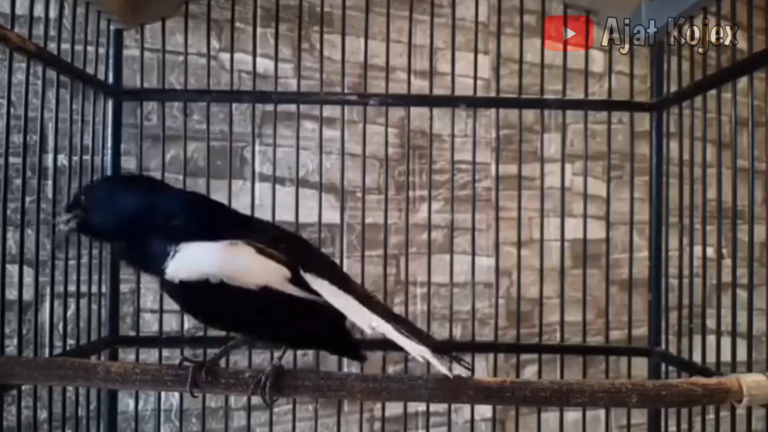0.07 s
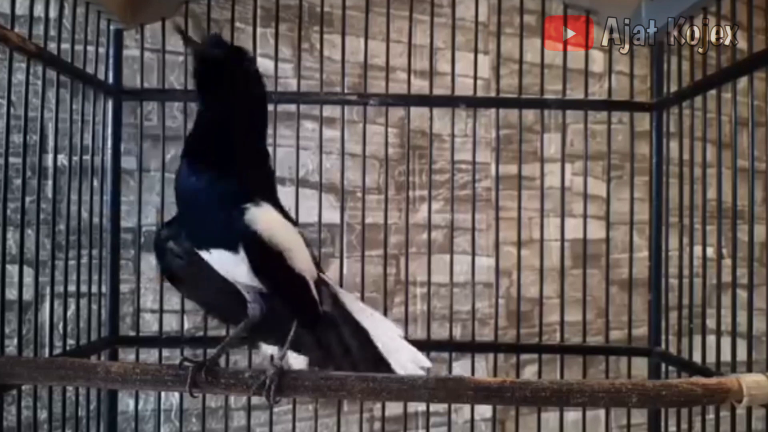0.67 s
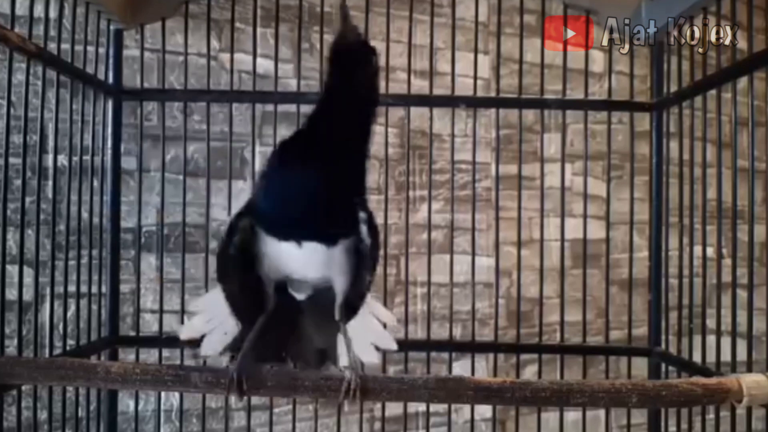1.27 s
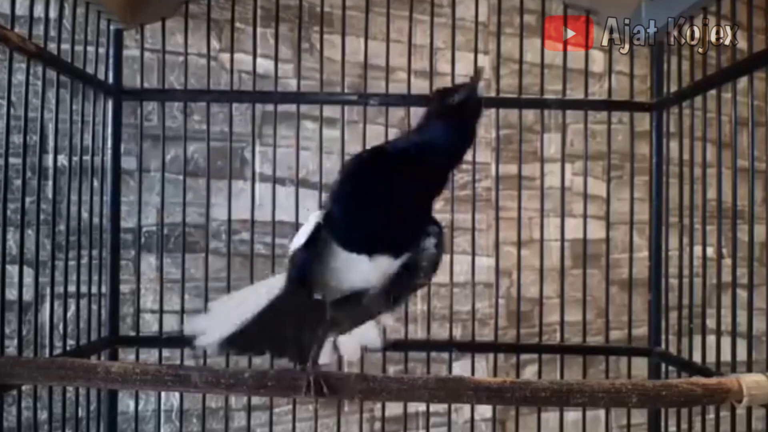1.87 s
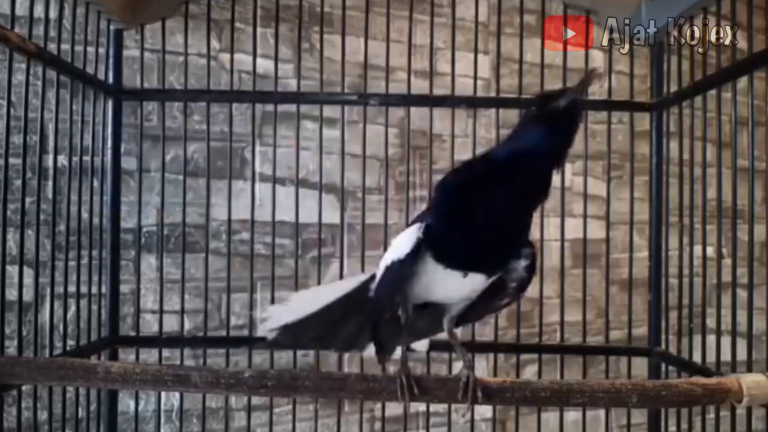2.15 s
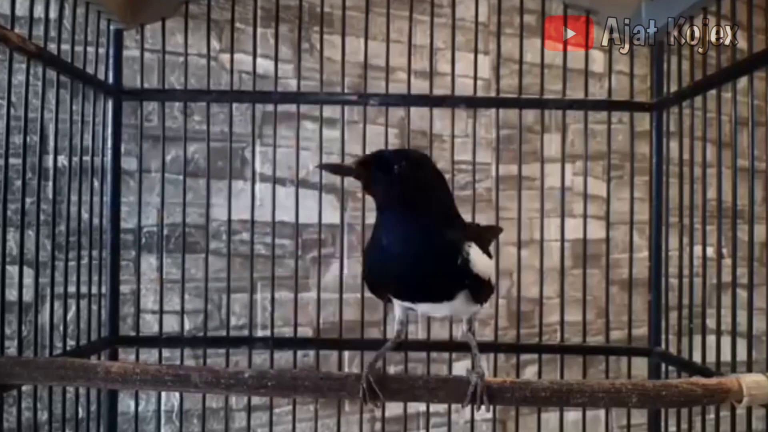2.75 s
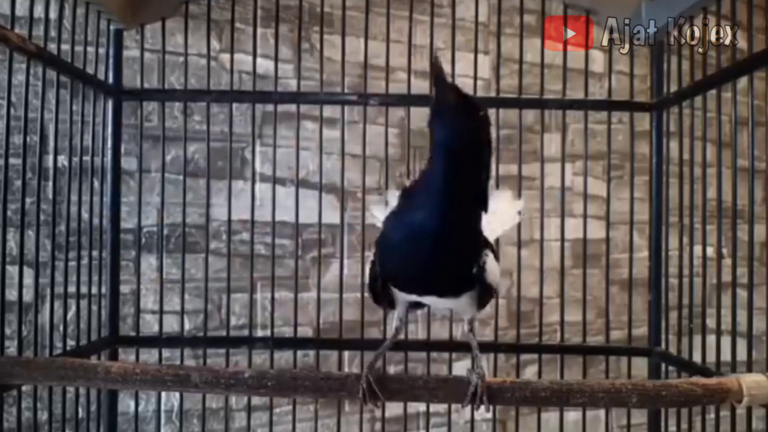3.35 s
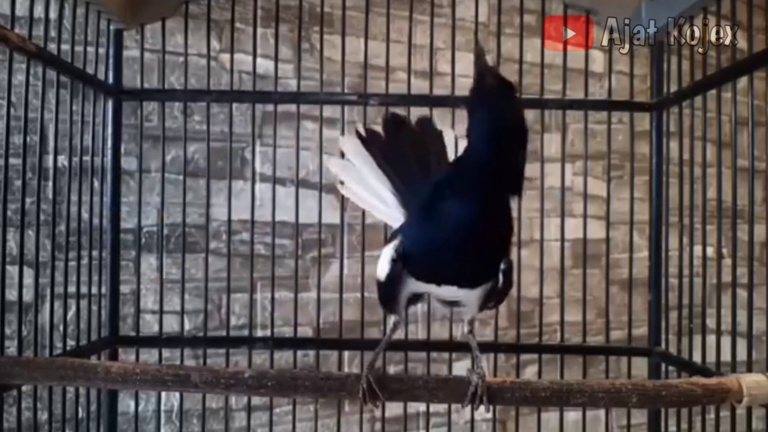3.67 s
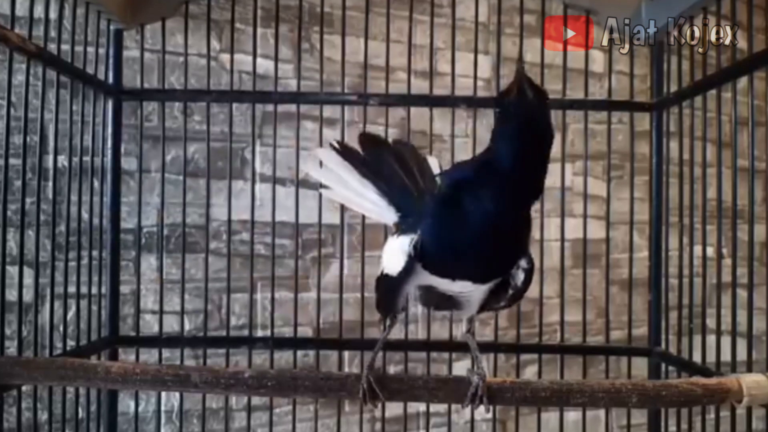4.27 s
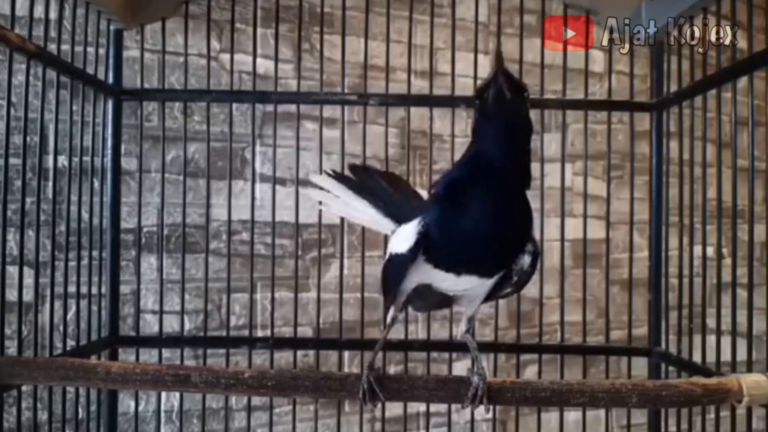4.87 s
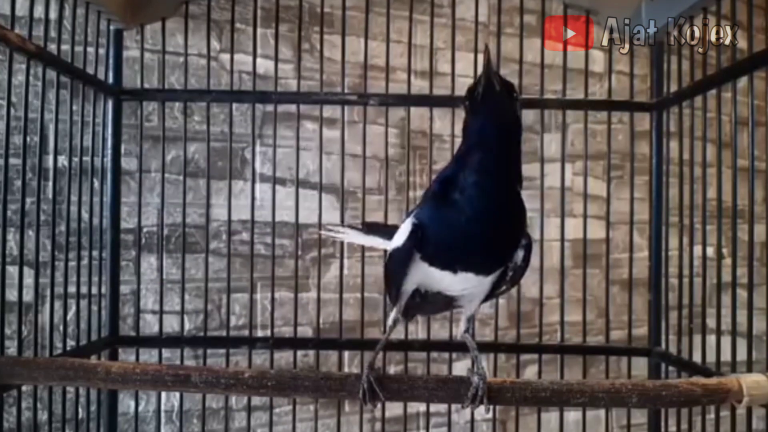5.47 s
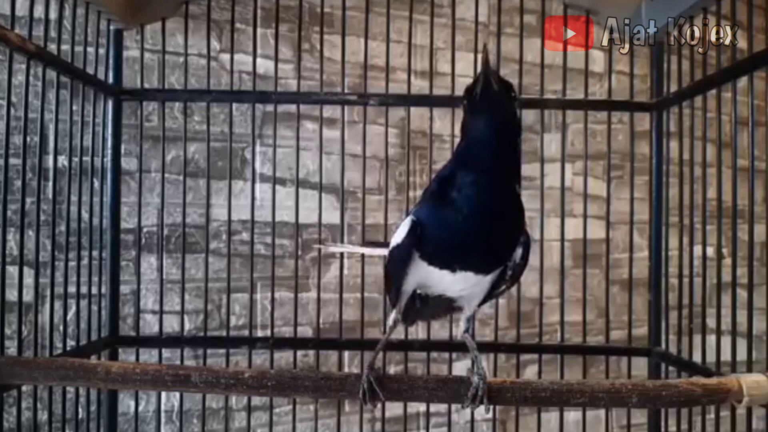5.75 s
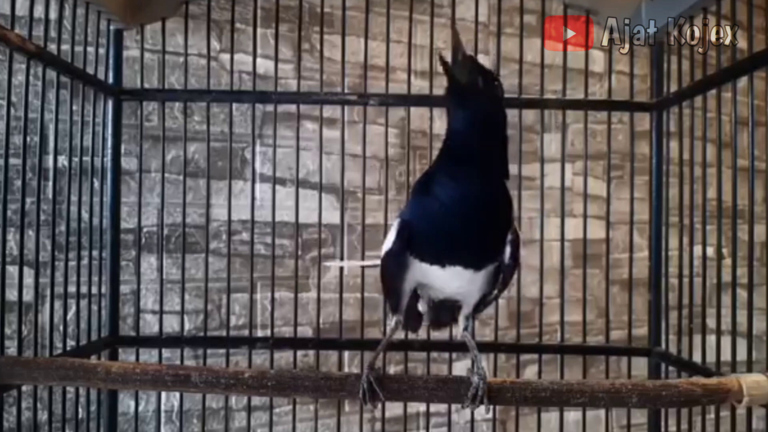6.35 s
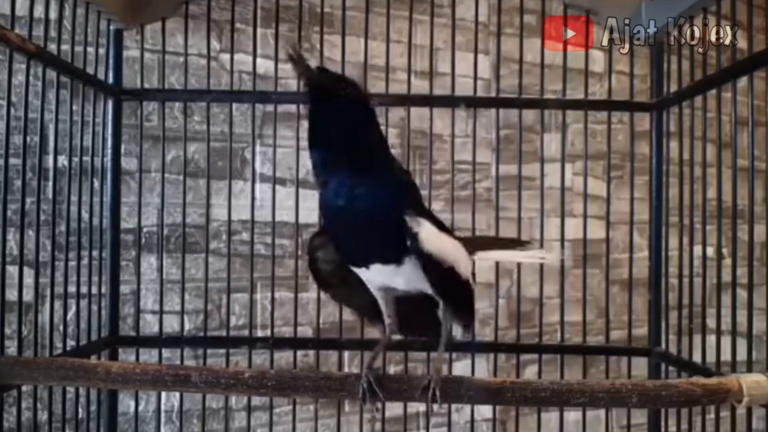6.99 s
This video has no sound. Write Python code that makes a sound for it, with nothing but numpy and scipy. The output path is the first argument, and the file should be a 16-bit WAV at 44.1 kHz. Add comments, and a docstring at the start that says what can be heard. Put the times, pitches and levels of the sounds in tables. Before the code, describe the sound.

Loud, rapid birdsong comes from a single caged bird right by the microphone. Clear whistles and darting glides tumble together with hoarse, reedy notes, then trills and brief buzzing rasps mix in. Near the end the feathers give a very soft puff before a closing warble. The small room adds a short echo and a faint low rumble, and the peaks overload a little.

```python
"""A caged magpie-robin close to the microphone, a stone wall behind it, in a small room with a faint rumble.
It opens with loud whistles, quick glides and reedy notes, overlapping from the two sides of its syrinx.
Trills join after a second, rasps after three; at 5.5 s one note keeps breaking to the octave below.
Near 6.6 s the bird shifts on its perch, then ends on a warble and a hook. All along, the room answers
briefly and the loudest notes overload the recorder."""
import sys
import numpy as np
from scipy import signal
from scipy.fft import rfft, irfft
from scipy.io import wavfile
from scipy.ndimage import uniform_filter1d

SR = 44100
rng = np.random.default_rng(int(sys.argv[2]) if len(sys.argv) > 2 else 0)


def digitize_waveform(pressure):
    """Quantize a signal to 16-bit integers and store it at the path in sys.argv[1].

    Rows of a 2-D input are taken as channels; values are limited to [-1, 1].
    """
    field = np.atleast_2d(pressure).T
    bounded = np.clip(field, -1, 1)
    quanta = np.round(bounded * 32767).astype(np.int16)
    wavfile.write(sys.argv[1], SR, quanta)


N = 313992


def gain_of(db):
    """Decibels to a factor."""
    return 10 ** (np.asarray(db) / 20)


def unit_rms(x):
    """Scales to rms 1."""
    return x / np.sqrt(np.mean(x ** 2) + 1e-20)


def value_at(points, hz):
    """Reads (f/Hz, value) points on a log-frequency axis."""
    f, value = np.transpose(points)
    return np.interp(np.log(hz + 1), np.log(f + 1), value)


def shaped_noise(spectrum):
    """Scene-long noise coloured by (f/Hz, level/dB) points."""
    gains = gain_of(value_at(spectrum, np.fft.rfftfreq(N, 1 / SR)))
    return irfft(rfft(rng.standard_normal(N)) * gains, N)


def wander(t, hz):
    """Smooth random motion of rms 1, as long as t, rolling off around hz."""
    f = np.fft.rfftfreq(len(t), 1 / SR)
    return unit_rms(irfft(rfft(rng.standard_normal(len(t))) * np.exp(-(f / hz) ** 2 / 2), len(t)))


def phase_of(hz):
    """Running phase of a pitch curve."""
    return 2 * np.pi * np.cumsum(hz) / SR


def add(mix, start, sound):
    """Mixes a sound in at start seconds."""
    part = mix[max(round(start * SR), 0):][:len(sound)]
    part += sound[:len(part)]


def span(start, end, edge_s=.0035):
    """Times and soft-edged gate of one note."""
    t = np.arange(start - edge_s / 2, end + edge_s, 1 / SR)
    ramp = np.clip(np.minimum(t - t[0], (t[-1] - t) / 2) / edge_s, 0, 1)
    return t, np.sin(np.pi / 2 * ramp) ** 2


def either_side(t, start, length, share):
    """How far a note is before and after the moment at a share of its length, each 0-1."""
    share = np.clip(share, .02, .98)
    progress = np.clip((t - start) / length, 0, 1)
    return np.maximum(1 - progress / share, 0), np.maximum((progress - share) / (1 - share), 0)


def effort(t, start, length, loudest, onset_db=-5, swell_db=-15, fade_db=-9.5):
    """Level in dB: a note swells to its loudest moment and fades; a long one starts more gently."""
    before, after = either_side(t, start, length, loudest)
    onset = np.exp(-np.maximum(t - start, 0) / (.13 * length))
    return onset_db * onset + swell_db * before ** 2.16 + fade_db * after ** 1.29


def bend(start, length, first_hz, turn_hz, last_hz, turn, db, loudest, hoarse):
    """A note (times, gate, pitch, level, hoarseness) that slows into one turn and speeds away."""
    t, gate = span(start, start + length)
    before, after = either_side(t, start, length, turn)
    hz = turn_hz + (first_hz - turn_hz) * before ** 2.1 + (last_hz - turn_hz) * after ** 1.5
    return t, gate, hz, db + effort(t, start, length, loudest), hoarse


def sweep(start, length, first_hz, last_hz, db, loudest, hoarse):
    """A note that glides one way, slowing a little; a falling one dies away as it drops."""
    t, gate = span(start, start + length)
    hz = first_hz + (last_hz - first_hz) * np.clip((t - start) / length, 0, 1) ** .85
    octaves_fallen = np.maximum(np.log2(first_hz / hz), 0)
    return t, gate, hz, db - 3.5 * octaves_fallen ** 2 + effort(t, start, length, loudest), hoarse


def gesture(rows):
    """A note drawn through timed points: times, gate and a smoothed curve for each further column."""
    times, *columns = np.transpose(rows)
    times = np.sort(times)
    t, gate = span(times[0], times[-1])
    curves = [uniform_filter1d(np.interp(t, times, c), size=180, mode="nearest") for c in columns]
    return t, gate, *curves


def background():
    """A faint, distant rumble that swells and sinks behind the bird."""
    # spectrum of the rumble: f/Hz, level/dB
    spectrum = [(20, -17.5), (50, -3.5), (110, 1.5), (190, -6), (320, -9.5), (600, -20), (1200, -24),
                (2500, -28.5), (5000, -34), (10000, -44), (16000, -38)]
    # its slow rise and fall: t/s, level/dB
    levels = [(0, -51), (.8, -48), (1.6, -50.5), (2.2, -46), (2.6, -46), (3.2, -47), (3.8, -49),
              (4.6, -49.5), (5.5, -54), (6.2, -56.5), (6.65, -51), (7.1, -62.5)]
    t = np.arange(N) / SR
    rumble = unit_rms(shaped_noise(spectrum))
    return gain_of(np.interp(t, *np.transpose(levels)) + 1.8 * wander(t, 6)) * rumble


def tone(phase, overtones_db=0, sheen_db=0, sheen_hz=13800, sheen_width_hz=2200):
    """A near sine: the throat holds overtones back, the open beak favours those in the top octave."""
    hz = np.gradient(phase) * SR / (2 * np.pi)
    overtones = 0
    for k, db in (2, -33), (3, -46), (4, -50):
        sheen = np.exp(-((k * hz - sheen_hz) / sheen_width_hz) ** 2)
        overtones += gain_of(db + (13 + sheen_db) * sheen) * np.sin(k * phase)
    return np.sqrt(2) * (np.sin(phase) + gain_of(overtones_db) * overtones)


def whistle(note, sheen_db=0, rattle_hz=125, weak_below_hz=2110, weak_db_per_octave=-11.5):
    """A pure note as (start, sound, hoarseness); when hoarse, the membrane flutters and rattles."""
    t, gate, hz, db, hoarse = note
    rough = np.clip(hoarse, 0, 1.2) ** 3
    rattle = np.sin(phase_of(rattle_hz * (1 + .25 * wander(t, 42))))
    unsteady = rough * np.interp(db, [-18, -3], [1.5, .8])  # a weakly blown membrane is less steady
    flutter = .06 * wander(t, 550) + .04 * rattle
    throb = 1 + .4 * unsteady * rattle + .2 * unsteady * wander(t, 900)
    throat_db = weak_db_per_octave * np.maximum(np.log2(weak_below_hz / hz), 0)
    hz = hz * (1 + .0029 * wander(t, 100) + unsteady * flutter)
    voice = tone(phase_of(hz), overtones_db=10 * rough, sheen_db=sheen_db)
    return t[0], gate * gain_of(db + throat_db) * throb * voice, hoarse


def whistles():
    """The whistled part of the song: the syrinx arches, glides and winds in pitch."""
    # arches and scoops: t/s, length/s, first f/Hz, turn f/Hz, last f/Hz, turn at/share, level/dB,
    # loudest at/share, hoarseness, extra sheen/dB
    arches = [ (0.04, 0.06, 3040, 3580, 3393, 0.24, -5, 0.48, 0.29, 0),
              (0.535, 0.036, 3410, 3190, 3294, 0.52, -6, 1, 0.4, 13),
              (0.788, 0.032, 3116, 3530, 3534, 0.35, -0.5, .6, 0.61, 14.5),
              (1.174, .061, 1600, 3600, 1390, 0.51, -14.5, 0.82, 0.78, -9),
              (1.835, .037, 2520, 2360, 1350, 0.45, -19.5, .45, 0.46, 5),
              (1.986, 0.06, 1336, 3557, 1664, 0.54, -13.5, 0.73, 0.82, 11),
              (2.18, 0.0863, 4134, 4145, 4306, 0.33, -2.5, 0.86, 0.26, 5),
              (2.559, 0.076, 3334, 3824, 3550, 0.54, -6, 0.56, 0.38, 24.5),
              (2.712, 0.17, 3546, 4153, 3690, 0.37, -10.5, 0.44, 0.35, 10.5),
              (2.927, 0.029, 6540, 5510, 6030, 0.41, -26.5, .45, 0.26, 6.5),
              (2.98, 0.022, 6300, 5210, 5600, 0.32, -23.5, 0.4, 0.42, 20),
              (3.021, 0.034, 6230, 4890, 5600, 0.38, -17, 0.54, 0.44, 8),
              (3.054, 0.035, 5170, 3950, 4710, 0.32, -20.5, 1, 0.62, 2),
              (3.08, 0.033, 4610, 3720, 4170, 0.48, -18, 0.19, 0.56, 4),
              (4.104, 0.026, 2467, 3050, 3010, 0.5, -3, 0.84, 0.71, 17),
              (4.128, 0.048, 5340, 3310, 4520, 0.8, -0.5, .45, 0.91, -5),
              (4.279, 0.04, 4580, 4187, 4580, 0.64, -2, .5, 0.63, -9),
              (4.28, 0.06, 2478, 2283, 3766, 0.22, -5, 0.96, 0.79, 0),
              (4.99, .042, 4587, 1933, 2960, 0.86, -5, 0.17, 0.83, 2),
              (5.032, 0.0188, 2810, 2225, 3210, 0.38, -4.5, 1, 0.77, -1),
              (5.332, .11, 2450, 2808, 2636, 0.48, -8.5, 0.22, 0.68, 4),
              (5.752, 0.03, 2906, 2978, 2650, 0.28, -1, 0.35, 0.56, 0),
              (5.854, 0.034, 2915, 2946, 2534, 0.13, -2.5, 0.32, 0.61, 7),
              (6.043, .125, 3860, 4270, 4170, 0.79, 0.5, 0.21, 0.44, -12),
              (6.238, 0.11, 3965, 4083, 3930, 0.62, 5.5, 0.62, 0.2, -4.5),
              (6.343, 0.057, 3235, 3240, 3540, 0.42, -1, 0.68, 0.54, 9),
              (6.489, 0.047, 1763, 3240, 3475, 0.56, -3.5, 0.51, 0.66, -8),
              (6.763, 0.049, 2143, 4414, 4450, 0.58, -7.5, 0.67, 0.49, 4.5),
              (6.802, 0.075, 3270, 3242, 4277, .16, -5, 0.47, 0.51, 5)]
    # quick glides: t/s, length/s, first f/Hz, last f/Hz, level/dB, loudest at/share, hoarseness
    glides = [ (0.178, 0.019, 5020, 2700, -5, 0.16, 1.04), (0.304, 0.023, 3360, 6000, -9, 0.45, 1.15),
              (0.324, 0.069, 4410, 2210, -3.5, 0.12, 0.88), (0.77, 0.024, 4500, 2006, -8, 0.52, 1),
              (0.778, 0.024, 5590, 3328, -8, 0.66, 0.99), (1.011, 0.044, 3480, 1900, -27.5, 0.057, 0.99),
              (1.144, 0.023, 3300, 1330, -20, 0.07, 1), (1.268, 0.015, 4730, 3500, -6.5, 0.62, 1.13),
              (1.285, 0.036, 3483, 1112, -2.5, 0.067, 0.85), (1.382, 0.032, 3160, 1440, -23, 0.073, 0.77),
              (1.631, 0.015, 5290, 4400, -22.5, 0.66, .9), (1.645, 0.05, 4830, 1500, -17.5, 0.28, 0.98),
              (1.725, 0.01, 4360, 2920, -13, 0.84, 1.11), (1.737, 0.041, 4040, 1077, -1.5, 0.23, 0.81),
              (1.778, 0.067, 2714, 3595, -12.5, 0.28, .7), (1.81, 0.018, 5080, 3390, -11, 0.77, 0.7),
              (1.94, 0.038, 5740, 1656, -17, .6, 0.86), (3.36, 0.066, 3450, 3240, -8, 0.16, 0.42),
              (3.47, 0.022, 3740, 2663, -0.5, 0.76, 0.89), (3.845, 0.015, 5620, 3095, 4, 0.24, 0.92),
              (3.848, 0.026, 7040, 6470, -6, 0.48, 0.77), (4.451, 0.045, 4480, 3156, 0.5, 0.16, 0.9),
              (4.625, 0.006, 5300, 4050, -18.5, 0.39, 0.86), (5.313, 0.028, 3175, 2313, -17.5, .2, 0.67),
              (6.005, .042, 3600, 3910, -14, 0.47, 0.7)]
    # winding whistles, one curve each: t/s, f/Hz, level/dB, hoarseness
    climb = [(.523, 4196, -28.5, .48), (.538, 3970, -5, 0.5), (.552, 4010, -23, 0.5), (.568, 4477, 0, 0.4),
             (.655, 4884, 2, 0.6), (.668, 4140, -5.5, 0.66), (.698, 4020, -3.5, .55),
             (.716, 3748, -4, 0.62), (.728, 3810, -19, 0.77)]
    dip_and_hold = [(.892, 4210, -26, 0.3), (.904, 2997, -4, 0.32), (.917, 3720, -6, 0.78),
                    (0.928, 3583, 3, 0.47), (.955, 3706, -7, .45), (0.969, 3635, -3.5, 0.81)]
    hold_and_flick = [(3.969, 2410, -37.5, .3), (3.983, 3210, -12, 0.74), (4.003, 3450, -2.5, 0.49),
                      (4.039, 3515, 6, 0.32), (4.065, 3687, -2, 0.5), (4.078, 4750, -21, 1)]
    lead_in = [(4.978, 3033, -15.5, 0.53), (4.992, 3310, -4.5, 0.64), (5.004, 2986, -3, 0.84),
               (5.031, 3000, -5.5, 0.94), (5.066, 2980, 2, 0.38), (5.08, 3278, -1, 0.75),
               (5.099, 3230, -6.5, 0.47), (5.113, 3670, 3, .4)]
    descent = [(6.401, 4520, -16, 0.58), (6.415, 4115, 2, 0.51), (6.44, 4050, -1.5, 0.55),
               (6.458, 3634, -0.5, 0.4), (6.473, 3106, -1.5, 0.37), (6.489, 2960, -6, .6)]
    warble = [(6.935, 2544, -22, 0.64), (6.948, 2870, -11.5, 0.34), (6.965, 2995, -8, 0.27),
              (6.978, 2730, -2, 0.43), (6.991, 3125, -2.5, 0.68), (7.003, 2394, -4.5, 0.69)]
    hook = [(7.042, 3240, -16, 0.91), (7.052, 1896, -11, 0.29), (7.061, 2685, -6, 0.52),
            (7.082, 2980, -18, 0.91)]
    for row in glides:
        yield whistle(sweep(*row))
    for *shape, sheen_db in arches:
        yield whistle(bend(*shape), sheen_db)
    for curve in climb, dip_and_hold, hold_and_flick, lead_in, descent, warble, hook:
        yield whistle(gesture(curve))


def air(leaking, level_db=-18, grain_db=3):
    """Air forced through the syrinx: a gritty hiss that follows the strength of the leak."""
    # spectrum of the hiss: f/Hz, level/dB
    spectrum = [(100, -16), (1000, -8), (2500, -1), (4500, 1.5), (6500, 1), (8500, -9.5), (11000, -7),
                (14000, -2), (16000, -8)]
    strength = np.sqrt(abs(uniform_filter1d(leaking ** 2, size=90)))
    hiss = unit_rms(shaped_noise(spectrum) * gain_of(grain_db * wander(leaking, 320)))
    return strength * hiss * gain_of(level_db)


def room(x, tail_db=-14, onset_s=.0017):
    """The microphone hears the bird directly, then a few near reflections and a short diffuse tail."""
    # early reflections: delay/s, gain
    echoes = [(.0021, 0.2), (.0047, 0.012), (.0079, 0.13), (.0113, 0.082), (.0165, -0.31), (.0228, 0.14)]
    # decay of the room: f/Hz, time to fall by 60 dB/s
    decay = [(300, 0.19), (1500, 0.11), (3500, 0.14), (6000, .14), (14000, 0.16)]
    hz, t, noise = signal.stft(rng.standard_normal(SR // 2), SR, nperseg=256)
    tail = signal.istft(noise * gain_of(-60 * t / value_at(decay, hz)[:, None]), SR, nperseg=256)[1]
    tail *= 1 - np.exp(-(np.arange(len(tail)) / SR / onset_s) ** 2)
    response = gain_of(tail_db) * tail / np.linalg.norm(tail)
    response[0] += 1
    for delay, gain in echoes:
        response[round(abs(delay) * SR)] += gain
    return signal.fftconvolve(x, response)[:N]


def throat(hz, throat_hz, width_octaves, skirt_db):
    """Ten harmonics of a buzzing syrinx through one throat resonance."""
    k = np.arange(1, 11)[:, None]
    detuning = np.log2(k * hz / throat_hz) / width_octaves
    gains = gain_of(-skirt_db * np.log10(1 + detuning ** 4)) * (k * hz < SR / 2)
    return np.sqrt(2) * (gains * np.sin(k * phase_of(hz))).sum(0) / np.linalg.norm(gains, axis=0)


def reeds(jitter=.024, doubling=.051):
    """Nasal notes; alternate cycles differ a little, which adds faint tones between the harmonics."""
    # reedy notes: t/s, length/s, first f/Hz, turn f/Hz, last f/Hz, turn at/share, level/dB,
    # loudest at/share, hoarseness, throat f/Hz
    notes = [ (0.302, 0.036, 1868, 2972, 2070, 0.43, -7.5, 1, 1.23, 4020),
             (0.335, 0.073, 2042, 1731, 1453, .5, -11, 0.44, 0.96, 3120),
             (0.962, 0.048, 1757, 1798, 1710, 0.45, -22, 0.92, 0.77, 3700),
             (1.322, 0.053, 1700, 1758, 1930, 0.4, -11.5, 0.59, 0.63, 3400),
             (1.407, 0.057, 2104, 2076, 2340, 0.52, -14.5, 0.88, 0.82, 3380),
             (1.463, 0.072, 1930, 1791, 1338, 0.11, -20, 0.17, 0.9, 2820),
             (2.484, 0.051, 1930, 2638, 2500, 0.78, -19.5, 0.37, 0.68, 3180),
             (3.807, 0.02, 1640, 1400, 1447, .5, -8, 0.8, 0.83, 3950),
             (4.437, .057, 998, 1829, 1154, 0.54, -6.5, 0.75, 0.75, 2960),
             (5.328, 0.023, 828, 869, 866, 0.42, -6, 1, 0.54, 2160),
             (5.726, .029, 3560, 1560, 2520, 0.79, -11.5, 0.34, 0.5, 2150),
             (5.83, 0.031, 3347, 1617, 2100, 0.92, -6.5, 0.32, 0.68, 2150),
             (5.947, 0.13, 1900, 2171, 2733, .45, -11, 0.45, 0.42, 2870)]
    for *shape, throat_hz in notes:
        t, gate, hz, db, hoarse = bend(*shape)
        hz = hz * (1 + jitter * hoarse ** 2 * wander(t, 510))
        alternation = 1 + doubling * np.cos(phase_of(hz) / 2)
        buzz = throat(hz, throat_hz, width_octaves=.69, skirt_db=26.5)
        yield t[0], gate * gain_of(db) * alternation * buzz, hoarse


def trills(jitter=.2, hurry_dip_db=23, rough_dip_db=16):
    """Pitch swings about a gliding centre; the voice thins on the way up when hurried or rough."""
    # trilled notes: t/s, length/s, first f/Hz, last f/Hz, level/dB, loudest at/share, hoarseness,
    # first rate/Hz, last rate/Hz, swing/Hz, falling part of a swing/share, roughness
    notes = [ (1.047, 0.098, 4222, 4557, 2.5, 0.1, 0.73, 44, 54, 441, 0.52, 0.11),
             (2.274, 0.1, 4727, 4697, -10.5, 0.32, 0.8, 99, 53, 640, .5, 0.22),
             (2.264, 0.13, 4000, 4245, -11.5, .2, 1.06, 117, 100, 190, 0.6, 0),
             (2.268, 0.12, 2990, 2446, -24, .45, 1, 86, 53, 270, 0.64, 0.4),
             (2.715, 0.095, 3938, 4142, -8.5, 0.53, 0.71, 102, 112, 370, 0.34, 0.01),
             (3.426, 0.057, 3760, 3760, -4, 0.87, 1.1, 61, 50, 523, 0.483, 0.66),
             (3.617, .057, 3555, 4322, -2.5, 0.57, 0.59, 58, 68, 393, .45, .05),
             (4.634, 0.12, 4597, 4750, -1, 0.18, 0.86, 87, 113, 618, 0.75, 0.08),
             (4.816, .097, 5097, 4810, 2, 0.16, .9, 110, 78, 657, 0.71, 0.05),
             (5.111, 0.15, 3386, 3424, 1, 0.11, 0.3, 27.5, 31, 149.2, 0.74, 0)]
    for *shape, first_rate, last_rate, swing_hz, fall, rough in notes:
        t, gate, hz, db, hoarse = sweep(*shape)
        rate = np.linspace(first_rate, last_rate, len(t)) * (1 + .065 * wander(t, 140))
        cycle = np.cumsum(rate) / SR % 1
        angle = np.pi * np.where(cycle < fall, cycle / fall, 1 + (cycle - fall) / (1 - fall))
        hz = (hz + swing_hz * np.cos(angle)) * (1 + jitter * rough * wander(t, 900))
        dip_db = hurry_dip_db * max(2 * fall - 1, 0) + rough_dip_db * rough
        rising = np.maximum(-np.sin(angle), 0)
        yield t[0], gate * gain_of(db - dip_db * rising) * tone(phase_of(hz)), hoarse


def rasps(flutter_hz=135, unevenness=.88, shimmer=7.9):
    """Low buzzes shaken in pitch and strength by a fast, uneven flutter."""
    # harsh notes: t/s, length/s, first f/Hz, last f/Hz, level/dB, loudest at/share, hoarseness,
    # throat f/Hz, flutter/share of pitch
    notes = [ (3.183, 0.023, 2010, 1643, -14, 0.64, 0.46, 2570, 0.067),
             (3.21, 0.0417, 870, 753, -11, 0.28, 0.51, 1806, 0.056),
             (5.391, 0.013, 1009, 779, -9, 0.48, 0.4, 1960, 0.078),
             (5.419, 0.0132, 916, 722, -11, 0.39, 0.6, 1980, 0.071),
             (6.627, .048, 1019, 825, -14.5, 0.64, 0.6, 1900, 0.036)]
    for *shape, throat_hz, flutter in notes:
        t, gate, hz, db, hoarse = sweep(*shape)
        shake = np.sin(2 * np.pi * flutter_hz * (t - t[0])) + unevenness * wander(t, 690)
        strength = gate * gain_of(db) * (1 + shimmer * flutter * wander(t, 510))
        buzz = throat(hz * (1 + flutter * shake), throat_hz, width_octaves=.72, skirt_db=31)
        yield t[0], strength * buzz, hoarse


def stutter(breaks_per_s=36, lift=.025, hoarse=.6):
    """The membrane flips in and out of period doubling, breaking to the octave below."""
    # course of the breaking note: t/s, f/Hz, level/dB, depth of the break/0-1
    curve = [(5.514, 2790, -40, 0.43), (5.53, 2464, -14, 0.07), (5.548, 2438, -10, 0.7),
             (5.6, 2503, -4.5, 0.25), (5.632, 2348, -6.5, 0.69), (5.652, 2270, -20, 0.1)]
    t, gate, hz, db, depth = gesture(curve)
    flip = -np.sin(2 * np.pi * breaks_per_s * (t - curve[0][0]))
    broken = .5 + .5 * np.tanh(8 * (flip - .15))
    phase = phase_of(hz * (1 + lift * (2 * broken - 1) + .007 * wander(t, 500)))
    octave_below = np.sin(phase / 2) + gain_of(-15) * np.sin(1.5 * phase)
    voice = tone(phase, overtones_db=6) * (1 - depth * broken) + depth * broken * octave_below
    return t[0], gate * gain_of(db) * voice, hoarse


def feather_puff(start_s=6.58, length_s=.16, centre_hz=299, width_hz=130, level_db=-41.5):
    """A soft swell of low noise from the feathers as the bird shifts on its perch."""
    t = np.arange(N) / SR
    swell = np.sin(np.pi * np.clip((t - start_s) / length_s, 0, 1))
    noise = unit_rms(wander(t, width_hz) * np.sin(2 * np.pi * centre_hz * t))
    return gain_of(level_db) * swell * noise


def scene(clear_leak=.006):
    """The song at one close microphone, in the room; hoarse notes leak far more air than clear ones."""
    song, leaking = np.zeros((2, N))
    for start, sound, hoarse in *whistles(), *reeds(), *trills(), *rasps(), stutter():
        leak = clear_leak + np.clip(hoarse, 0, 1) ** 2.4
        add(song, start, sound)
        add(leaking, start, sound * leak)
    return (room(song + air(leaking)) + feather_puff() + background())[None]


def record(dry, ceiling=.88, bias=.037, low_cut_hz=25, high_cut_hz=16250):
    """Soft, slightly lopsided overload adds overtones, the highest folding back; then the band limits."""
    driven = ceiling * (np.tanh(dry / ceiling + bias) - np.tanh(bias))
    driven = signal.sosfilt(signal.butter(1, low_cut_hz, "high", fs=SR, output="sos"), driven)
    low_pass = signal.firwin(255, high_cut_hz, window=("kaiser", 8), fs=SR)
    return signal.oaconvolve(driven, low_pass[None], "same")


dry = scene()
out = record(dry)
digitize_waveform(out)
```